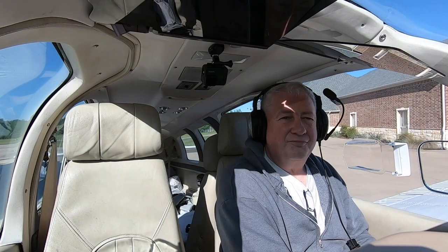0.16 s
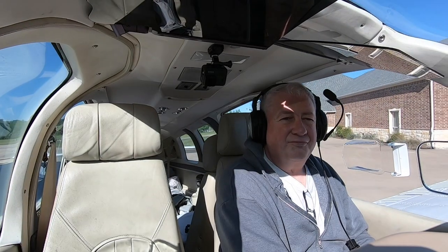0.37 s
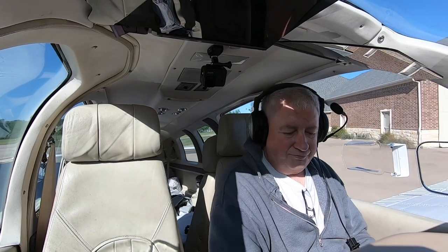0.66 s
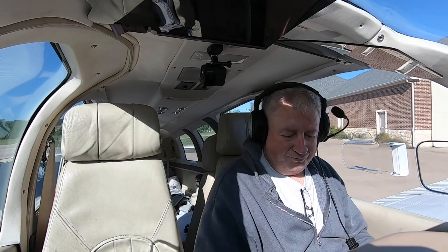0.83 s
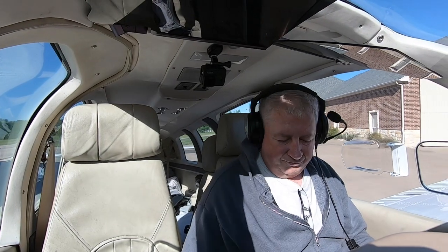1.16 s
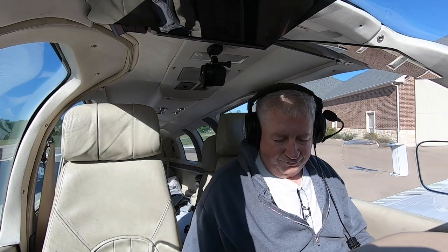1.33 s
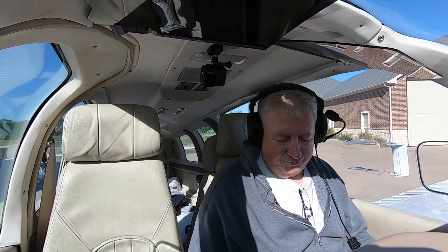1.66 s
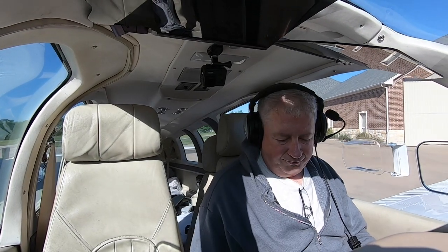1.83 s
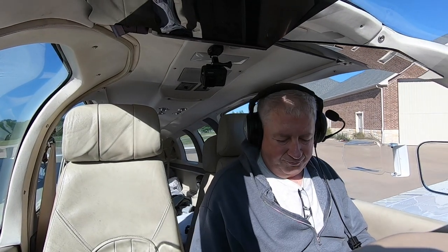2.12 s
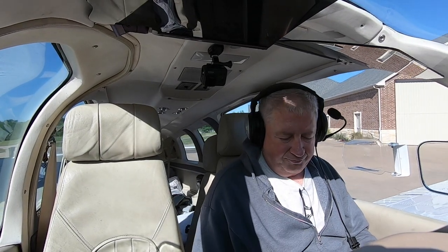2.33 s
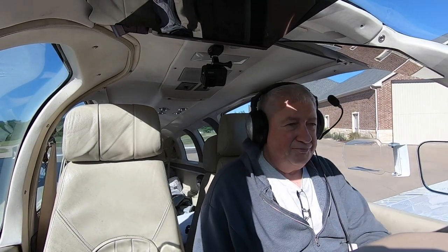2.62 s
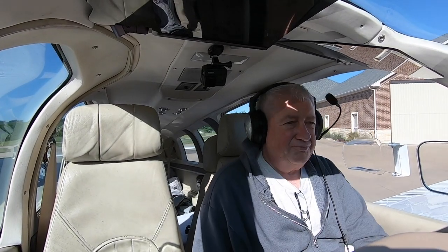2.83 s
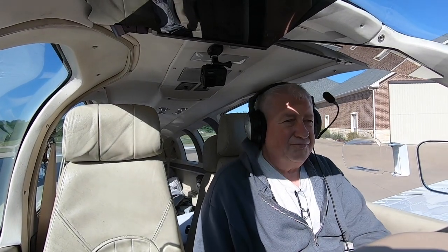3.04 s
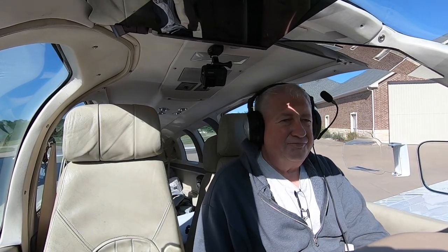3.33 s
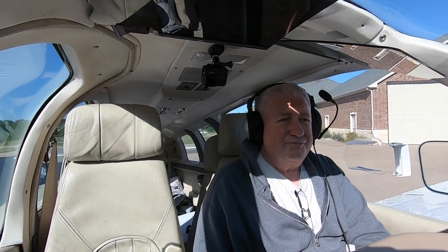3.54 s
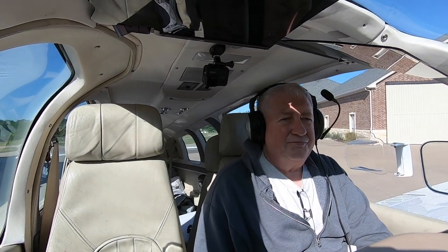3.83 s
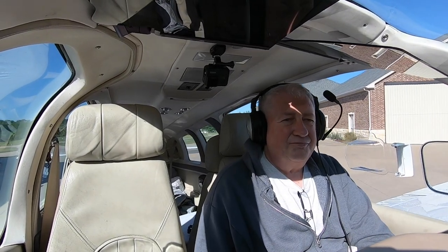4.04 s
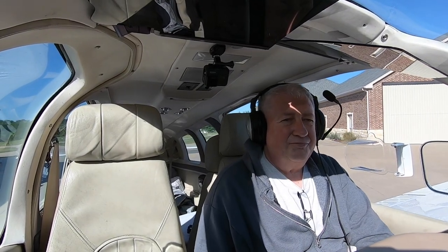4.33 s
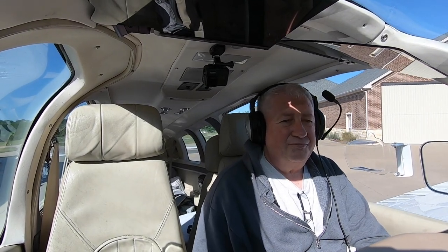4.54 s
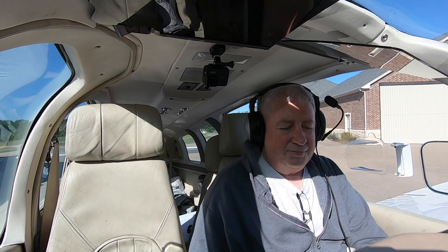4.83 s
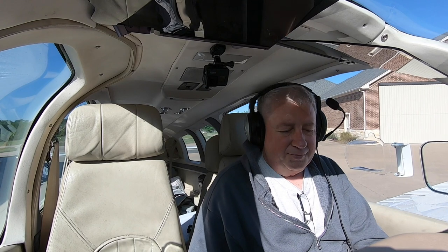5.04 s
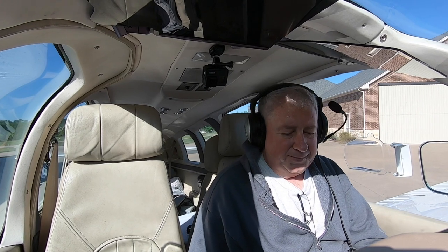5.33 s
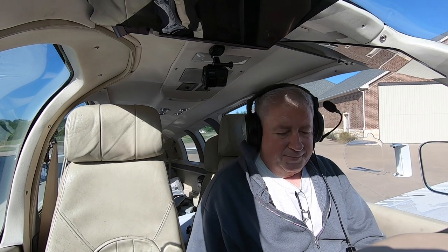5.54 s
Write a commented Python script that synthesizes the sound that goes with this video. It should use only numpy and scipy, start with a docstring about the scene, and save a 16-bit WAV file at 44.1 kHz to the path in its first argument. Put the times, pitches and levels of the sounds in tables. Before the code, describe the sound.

A piston aircraft engine idles with a deep, steady drone and propeller wash, heard from inside a small cabin.

```python
"""A deep, steady drone: a six-cylinder aircraft engine and three-blade propeller idling near 1090 rpm,
heard at close range from a stereo microphone inside the small cabin. Firing and blade beats sound as
clean multiples of the engine cycle. Propeller wash buffets and roars over the skin, and the valve gear
hisses and taps in step with the cycle. Loose trim rattles now and then; behind it all, gears and an
instrument rotor whine faintly."""
import sys
import numpy as np
from scipy import signal
from scipy.fft import rfft, irfft, next_fast_len
from scipy.io import wavfile
from scipy.ndimage import uniform_filter1d

SR = 44100
rng = np.random.default_rng(int(sys.argv[2]) if len(sys.argv) > 2 else 0)


def pcm_store(signal):
    """Save signal as 16-bit PCM."""
    levels = np.round(np.clip(np.atleast_2d(signal), -1, 1) * 32767)
    wavfile.write(sys.argv[1], SR, levels.astype(np.int16).T)


N = 250124
IDLE_RPM = 1088
CYCLE_HZ = IDLE_RPM / 120   # one four-stroke cycle is two turns

# the crankshaft settles and hunts a little: (time [s], speed [rpm])
ENGINE_SPEED = [(0.1, 1108), (1.05, 1093), (1.75, 1085), (2.55, 1083), (3.35, 1085), (4.0, 1089),
                (4.5, 1088), (5.15, 1080), (5.67, 1081)]
# the firing tone, its double and its triple swell and sink: (time [s], level [dB], level [dB], level [dB])
MAIN_TONES = [(0.1, -22, -32, -22), (0.5, -19.5, -27, -22), (0.8, -20, -26, -19), (1.35, -18.5, -23.5, -25),
              (1.8, -21, -22.5, -21.5), (2.3, -19, -20, -21.5), (3.15, -22, -19.5, -20),
              (3.75, -21, -16.5, -25), (4.15, -22, -18, -21.5), (4.5, -20.5, -21, -19.5),
              (4.75, -19.5, -24, -23.5), (5.15, -17, -17.5, -23), (5.6, -17.5, -24.5, -25.5)]
# overtones that move with the double: (cycle multiple, level with the double at -20 [dB], share of swing)
LINKED_TONES = [(24, -36.5, 2.3), (36, -41, -0.64)]
# a low half-order engine tone and two high firing overtones:
# (cycle multiple before rounding, idle level [dB], rise [dB per 10 rpm])
STEADY_TONES = [(9, -28.5, 1), (54, -48, 0), (89.75, -50.5, 3)]
# in-between tones of unequal cylinders: (cycle multiple, idle level [dB], rise [dB per 10 rpm])
UNEVEN_TONES = [(3, -37.5, -4.5), (4, -38.5, 4.5), (5, -44, 3.5), (7, -37, 2.5), (8, -39.5, 2.3),
                (10, -35, -3.5), (11, -35, -4.5), (14, -37.5, 1), (15, -46, -4), (19, -33, -1),
                (20, -39.5, 3), (21, -31, 1.5), (22, -37, -.5), (23, -41, 1.7), (26, -38, -1.7),
                (29, -38.5, -1), (30, -40, -0.5), (31, -44, 0.5), (33, -40.0, -1)]
# the propeller wash rises and slackens: (time [s], roar level [dB], hiss level [dB])
WASH_LEVELS = [(0.0, -35, -47.5), (0.22, -32, -47), (0.79, -28.5, -43.5), (1.1, -29, -45), (2.7, -29, -44),
               (2.87, -27, -43), (3.55, -26.5, -42.5), (3.95, -30.5, -45.5), (4.3, -28.5, -44.5),
               (4.9, -33, -46), (5.2, -32, -46.5), (5.64, -31, -46.5)]
# low buffeting of the cabin: (frequency [Hz], level [dB])
BUFFET_SPECTRUM = [(15, -11), (30, -13), (50, -0.5), (66, -5.5), (110, -5.5), (145, -4), (170, -11),
                   (240, -9.5), (310, -16), (420, -33)]
# air roaring over the skin: (frequency [Hz], level [dB])
ROAR_SPECTRUM = [(220, -15.5), (330, 0), (510, -2.5), (610, -4.5), (740, -7), (850, -5), (970, -8),
                 (1100, -9.5), (1190, -11.5), (1400, -16), (1900, -30.5)]
# valve-gear hiss: (frequency [Hz], level [dB])
HISS_SPECTRUM = [(1200, -17), (1600, 0.5), (1950, -5), (2300, -7), (2750, -4.5), (3300, -9), (4000, -15),
                 (4500, -18), (6000, -23.5), (8700, -25.5), (9250, -35), (10000, -27), (11300, -47),
                 (14000, -46)]
# each cylinder's share of the valve-gear noise, in firing order: (level [dB])
CYLINDER_SHARES = [-2, -2, -0.2, -2, -1.5, 1]
# panel and cabin resonances: (frequency [Hz], width [Hz], boost [dB])
PANEL_RESONANCES = [(119, 19, -1), (220, 16, 2.5), (272.4, 17, 6), (322, 28, 3.5), (363, 43, 5),
                    (439, 13, 2), (492, 10, 7.5), (544, 31, 2.5), (607, 24, 7.5), (661.4, 46, 4),
                    (686, 34, 4.5), (762, 17, 5), (816, 12, 6), (1042, 20, 6), (1124, 15, 7.5),
                    (1292, 50, 4)]
# the clearest taps, valve-lifter knocks and loose rattles:
# (time [s], level [dB], pitch [Hz], brightness [dB per octave])
CLEAR_TAPS = [(0.1869, -31, 2530, -7), (0.5983, -33.5, 2600, 0.5), (0.8005, -26.5, 2870, 4),
              (0.857, -34, 2820, 0.5), (0.9674, -31, 2720, 1), (1.1837, -32, 2660, -2),
              (1.297, -31.5, 2830, -11), (1.8465, -31.5, 2860, 0.5), (1.9699, -32, 2860, 0.5),
              (2.4009, -33.5, 2810, 3), (2.489, -33, 2800, 0.5), (2.9513, -30, 2800, -1),
              (3.3957, -32, 2710, -2), (4.447, -30.5, 2870, 0.5), (4.616, -30.5, 3000, 2),
              (4.705, -33, 2890, 0.5), (4.8917, -30, 2870, 0.5), (5.1632, -36, 3110, 2),
              (5.222, -36, 2660, 4)]
# the trim's ringing modes: (frequency [Hz], level [dB], time to fall 60 dB [s])
TRIM_MODES = [(900, -4, 0.018), (1790, -1.5, 0.02), (2600, -2, 0.012), (2760, 3, 0.018), (3110, -1.5, 0.01),
              (3300, -3, .015), (3770, -10, 0.018), (4300, -7.5, 0.02), (5400, -14.5, 0.0067),
              (6500, -21.5, .008), (7900, -15, .008), (10000, -26, .008)]
# engine-driven gears and alternator: (cycle multiple, idle level [dB], rise [dB per 10 rpm],
# level flutter [dB], phase flutter [rad], flutter rate [Hz])
GEAR_TONES = [(228, -61, 0.5, 2.0, 1.0, 6.0), (230, -65, -.5, 2.0, 1.0, 6.0),
              (456, -67, 4.0, 2.5, 2.0, 25.0)]
# how alike the microphone's two ports hear the cabin: (frequency [Hz], likeness [0 to 1])
PORT_LIKENESS = [(60, 0.93), (130, 0.96), (300, 0.99), (400, 0.97), (580, 0.81), (840, .42), (1230, 0.1),
                 (1790, 0.097), (2610, 0.78), (3800, 0.49), (8000, .05), (12000, .5)]
# balance at the microphone: (frequency [Hz], left minus right [dB])
PORT_BALANCE = [(60, -.1), (190, -.5), (400, .6), (580, 1.9), (840, -1.5), (1790, -3), (2610, -2.1),
                (3800, -1.1), (8000, .6), (12000, -1.1)]


def engine_drone(cycle, rpm):
    """Engine tones and blade beats fill the cabin; firings vary, so each wavers in level and phase."""
    firing_db, double_db, triple_db = in_time(MAIN_TONES)
    tones = [(6, firing_db), (12, double_db), (18, triple_db)]
    tones += [(round(multiple), db + share * (double_db + 20)) for multiple, db, share in LINKED_TONES]
    tones += [(round(multiple), db + rise * (rpm - IDLE_RPM) / 10) for multiple, db, rise in STEADY_TONES]
    out = np.zeros((2, N))
    for multiple, db in tones:
        ratio = multiple / 6   # to the firing rate
        dispersion = 5.0 + 0.9 * ratio ** 2   # the pulse arrives with its overtones shifted in phase
        waver = min(ratio, 4)   # higher tones waver more
        phase = 2 * np.pi * multiple * cycle + dispersion + 0.033 * waver * drift(4.3)
        out += port_tone(db + 0.22 * waver * drift(11.0), phase, multiple * CYCLE_HZ)
    return out


def uneven_cylinders(cycle, rpm):
    """Unequal cylinders sound weaker multiples of the cycle between the main tones."""
    taken = {round(row[0]) for row in [*LINKED_TONES, *STEADY_TONES, *UNEVEN_TONES]}
    faint = [(multiple, -48 - 0.2094 * (multiple - 25) + 3.0 * rng.standard_normal(), 0)
             for multiple in range(25, 66) if multiple not in taken]
    out, step = 0, 8   # low tones need only every eighth sample
    for multiple, db, rise in list(UNEVEN_TONES) + faint:
        phase = 2 * np.pi * round(multiple) * cycle + rng.uniform(0, 2 * np.pi) + 0.3 * drift(0.6)
        level_db = db + rise * (rpm - IDLE_RPM) / 10 + 1.3 * drift(0.8)
        out = out + port_tone(level_db[::step], phase[::step], multiple * CYCLE_HZ)
    return signal.resample_poly(out, step, 1, axis=1, padtype="line")[:, :N]


def propeller_wash(cycle, roar_db):
    """Air from the propeller buffets the cabin and roars over its skin, pulsing at the firing rate."""
    buffet_db = -28.5 + 0.34 * (roar_db + 30)   # follows a third of the roar's swing
    buffet = air_noise(BUFFET_SPECTRUM, wander_db=2.0, wander_hz=1.0)
    roar = air_noise(ROAR_SPECTRUM, wander_db=1.0, wander_hz=1.5, pulse_db=firing_pulse_db(cycle + 0.4))
    return from_db(buffet_db) * buffet + from_db(roar_db) * roar


def valve_hiss(cycle, hiss_db):
    """The valve gear hisses in puffs, in step with the cylinders."""
    hiss = air_noise(HISS_SPECTRUM, wander_db=0.02, wander_hz=4.4, pulse_db=firing_pulse_db(cycle))
    return from_db(hiss_db) * hiss


def knocks_and_rattles(cycle):
    """Clear taps, a valve lifter's knock once a cycle and faint random rattles, in CLEAR_TAPS form."""
    knock_times = np.flatnonzero(np.diff(np.floor(cycle + 0.27))) / SR
    knocks = [(s, -46.5 + 1.5 * rng.standard_normal(), 2750, 0) for s in knock_times]
    gap, strength, pitch = rng.random((160, 3)).T
    rattle_times = np.cumsum(-np.log(1 - gap) / 16.0)   # about 16 a second
    rattle_db = -42 - 2.5 * np.log(1 - strength)
    rattle_hz = 2800 * (0.92 + 0.22 * pitch)
    rattles = [(s, db, hz, 0) for s, db, hz in zip(rattle_times, rattle_db, rattle_hz) if s * SR < N]
    return list(CLEAR_TAPS) + knocks + rattles


def trim_ring(strikes):
    """Each strike is a few milliseconds of chatter that rings the cabin trim, most near its own pitch."""
    length, chatter_db = round(0.02 * SR), -39   # the force lies far below the ring it builds up
    fade = np.exp(-np.arange(length) / (0.0039 * SR))
    out = np.zeros((2, N))
    for mode_hz, mode_db, t60 in TRIM_MODES:
        force = np.full((2, N + length), 1e-18)
        for s, db, tap_hz, brightness in strikes:
            near_db = 4.1 * np.exp(-(np.log(mode_hz / tap_hz) / 0.15) ** 2)
            tilt_db = brightness * np.log2(mode_hz / tap_hz)
            noise = rng.standard_normal((3, length))
            chatter = rms_one(fade * (noise[0] + 0.33 * noise[1:]))   # partly alike at both ports
            gain = from_db(db + mode_db + near_db + tilt_db + chatter_db)
            start = round(s * SR)
            force[:, start:start + length] += gain * chatter
        decay, angle = from_db(-60 / (t60 * SR)), 2 * np.pi * mode_hz / SR
        out += signal.lfilter([0, np.sin(angle)], [1, -2 * decay * np.cos(angle), decay ** 2], force[:, :N])
    return signal.sosfilt(signal.butter(4, 11500, fs=SR, output="sos"), out)   # upholstery takes the top


def rotor_whine(hz=2863):
    """An electric instrument rotor holds its pitch, faint under the engine."""
    phase = 2 * np.pi * hz * np.arange(N) / SR + 0.3 * drift(2.5)
    return port_tone(-61 + 1.4 * drift(1.8), phase, hz)


def gear_whine(cycle, rpm):
    """Far in the background, gear and alternator tones ride on the engine speed and flutter."""
    load_db = 2.0 * np.cos(4 * np.pi * cycle)   # the gears load and unload once a turn
    extra_rpm = np.minimum(rpm - IDLE_RPM, 8.0)   # level follows speed only up to a point
    out = np.zeros((2, N))
    for multiple, db, rise, flutter_db, flutter_rad, flutter_hz in GEAR_TONES:
        phase = 2 * np.pi * round(multiple) * cycle + flutter_rad * drift(flutter_hz)
        level_db = db + rise * extra_rpm / 10 + flutter_db * drift(flutter_hz) + load_db
        out += port_tone(level_db, phase, multiple * CYCLE_HZ)
    return out


def firing_pulse_db(cycle):
    """A swell in level at each firing, uneven from one cylinder and one firing to the next."""
    firings = 6 * cycle + 1.0
    index = np.floor(firings).astype(int)
    strength_db = np.array(CYLINDER_SHARES)[index % 6] + 1.2 * rng.standard_normal(400)[index]
    return (1.1 + strength_db) * np.sin(np.pi * (firings % 1)) ** 2 + 0.45 * drift(9.0)


def air_noise(spectrum, wander_db, wander_hz, pulse_db=0):
    """Stereo noise heard through the panels, in fifth-octave bands that each wander in level; rms 1."""
    low, top = spectrum[0][0], spectrum[-1][0]
    edges = np.geomspace(low, top, 1 + int(5 * np.log2(top / low)))
    white, out = rng.standard_normal((2, 2, N)), 0
    for k, (lo, hi) in enumerate(zip(edges, edges[1:])):
        mid, side = signal.sosfilt(signal.butter(2, [lo, hi], "band", fs=SR, output="sos"), white[k % 2])
        alike = at_hz(PORT_LIKENESS, np.sqrt(lo * hi))
        gain = from_db(wander_db * drift(wander_hz) + pulse_db)
        out = out + gain * (np.sqrt(1 + alike) * mid + np.sqrt(1 - alike) * side * [[1], [-1]])
    return rms_one(colour(out, lambda hz: at_hz(spectrum, hz) + panel_db(hz)))


def panel_db(hz):
    """Boost from the narrow panel and cabin resonances that the airflow excites."""
    return sum(boost / (1 + (2 * (hz - centre) / width) ** 2) for centre, width, boost in PANEL_RESONANCES)


def port_tone(level_db, phase, hz):
    """A tone at the microphone: the less alike the ports hear its pitch, the further apart in phase."""
    shift = 0.32 * np.arccos(at_hz(PORT_LIKENESS, hz)) * np.array([[1], [-1]])
    return np.sqrt(2) * from_db(level_db) * np.cos(phase + shift)


def gain_control(x, knee_db, share, release_db_s):
    """Part of the level above the knee is taken off within milliseconds and given back more slowly."""
    level_db = 20 * np.log10(np.abs(x).max(axis=0) + 1e-9)
    ramp = release_db_s * np.arange(N) / SR
    held_db = np.maximum.accumulate(level_db + ramp) - ramp
    cut_db = share * np.maximum(held_db - knee_db, 0)
    window = round(0.004 * SR)
    early_db = np.pad(cut_db[window // 2:], (0, window // 2), "edge")   # looks a moment ahead
    smooth_db = uniform_filter1d(uniform_filter1d(early_db, window), window)
    return x * from_db(-smooth_db)


def drift(hz):
    """Slow random wander of spread 1: noise through two one-pole low-passes at hz."""
    step, run_in = 40, 4000
    pole = np.exp(-2 * np.pi * hz * step / SR)
    noise = rng.standard_normal(N // step + run_in + 2)
    slow = signal.lfilter([1], [1, -2 * pole, pole ** 2], noise)[run_in:]
    return np.interp(np.arange(N) / step, np.arange(len(slow)), rms_one(slow))


def colour(x, db_of_hz):
    """Filter by a gain in dB given as a function of frequency; the ends are mirrored outward first."""
    edge = 4096
    wide = np.pad(x, ((0, 0), (edge, edge)), "reflect", reflect_type="odd")
    size = next_fast_len(wide.shape[1])
    hz = np.maximum(np.fft.rfftfreq(size, 1 / SR), 1)
    return irfft(rfft(wide, size) * from_db(db_of_hz(hz)), size)[:, edge:edge + N]


def in_time(rows):
    """Columns of a time table, one value a sample."""
    times, *columns = np.transpose(rows)
    return [np.interp(np.arange(N) / SR, times, column) for column in columns]


def at_hz(rows, hz):
    """Read a frequency table on a log axis."""
    frequencies, values = np.transpose(rows)
    return np.interp(np.log(hz), np.log(frequencies), values)


def from_db(db):
    """Decibels to gain."""
    return 10 ** (np.asarray(db) / 20)


def rms_one(x):
    """Scale to rms 1."""
    return x / np.sqrt(np.mean(x ** 2) + 1e-20)


def scene():
    """Everything that reaches the microphone's two ports in the cabin."""
    rpm, = in_time(ENGINE_SPEED)
    roar_db, hiss_db = in_time(WASH_LEVELS)
    cycle = np.cumsum(rpm / 120) / SR + 0.863   # running count of four-stroke cycles
    engine = engine_drone(cycle, rpm) + uneven_cylinders(cycle, rpm)
    rush = propeller_wash(cycle, roar_db) + valve_hiss(cycle, hiss_db)
    return engine + rush + trim_ring(knocks_and_rattles(cycle)) + rotor_whine() + gear_whine(cycle, rpm)


def record(dry):
    """At the microphone the ports differ a little, gain control evens the peaks and the top is cut."""
    ports = colour(dry, lambda hz: at_hz(PORT_BALANCE, hz) * np.array([[0.5], [-0.5]]))
    evened = gain_control(from_db(0.47) * ports, knee_db=-9.0, share=0.5, release_db_s=149)
    fade_in = np.minimum(np.arange(N) / (0.004 * SR), 1)
    top_cut = signal.cheby2(12, 20, 14400, fs=SR, output="sos")
    return signal.sosfiltfilt(top_cut, evened * fade_in)


dry = scene()
out = record(dry)
pcm_store(out)
```